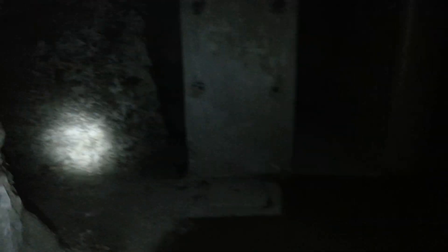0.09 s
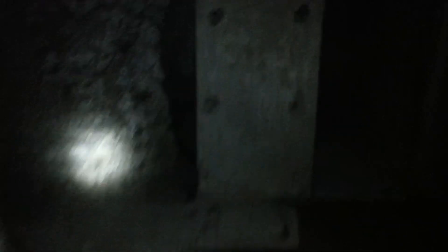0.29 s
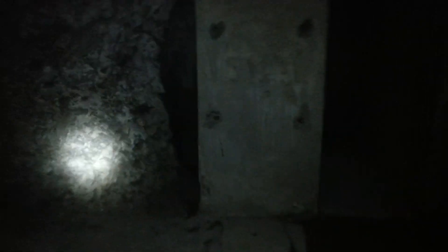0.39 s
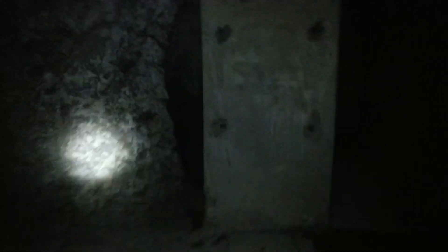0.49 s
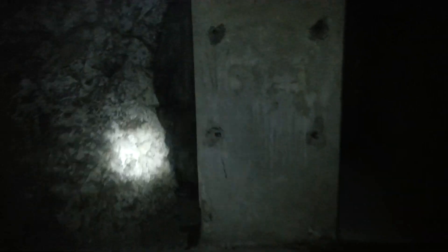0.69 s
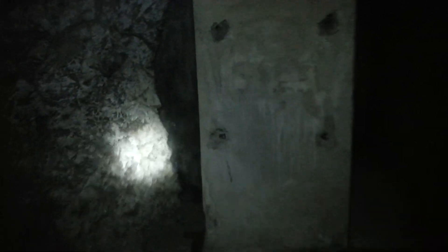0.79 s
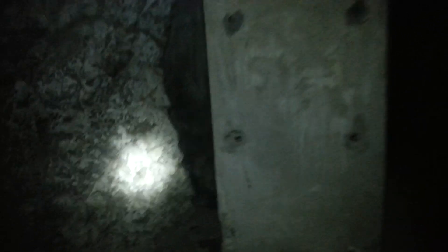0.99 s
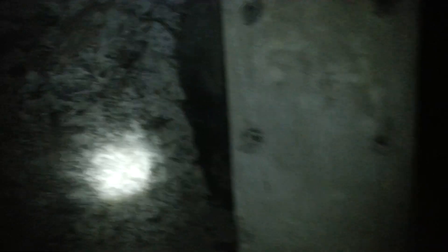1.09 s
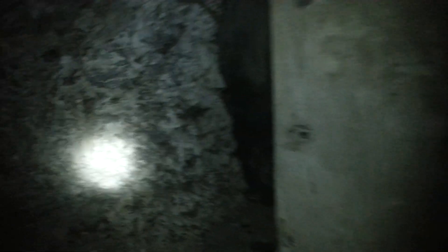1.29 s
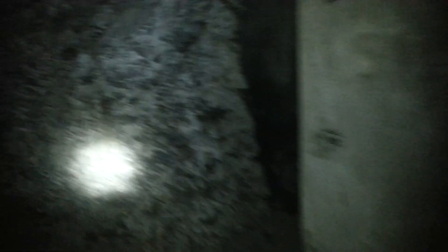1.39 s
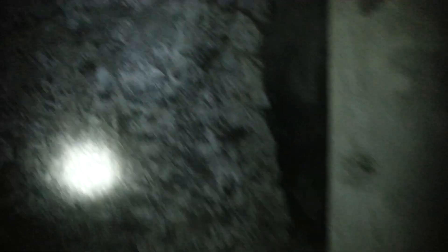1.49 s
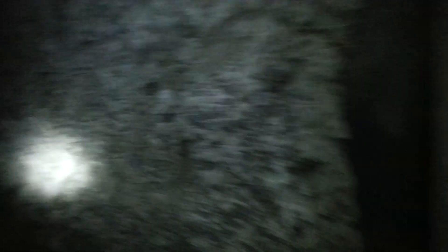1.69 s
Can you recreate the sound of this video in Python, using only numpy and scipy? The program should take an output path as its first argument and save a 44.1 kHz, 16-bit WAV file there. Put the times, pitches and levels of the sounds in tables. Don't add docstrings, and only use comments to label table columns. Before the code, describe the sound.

Footsteps on a gritty rock floor in a narrow stone tunnel: a heavy boot thud, bright clacks of kicked stones, scraping grit, a softer crunch, then a faint next step, heard close on a handheld phone.

```python
import sys
import numpy as np
from scipy import signal
from scipy.fft import rfft, irfft
from scipy.io import wavfile

SR = 44100
rng = np.random.default_rng(int(sys.argv[2]) if len(sys.argv) > 2 else 0)


def level_to_linear(level):
    exponent = np.asarray(level, float) / 20
    return 10 ** exponent


def generate_wav(signal):
    frames = np.transpose(np.atleast_2d(signal))
    scaled = np.clip(frames, -1, 1) * 32767
    pcm = np.round(scaled).astype(np.int16)
    wavfile.write(sys.argv[1], SR, pcm)


N = 74970
LEAD = 8192


def curve(table, hz):
    table = np.array(table, float)
    return np.interp(np.log(np.maximum(hz, 1)), np.log(np.maximum(table[:, 0], 1)), table[:, 1])


def unit(x):
    return x / np.sqrt(np.mean(x ** 2))


def octaves(x, centres):
    size = x.shape[-1]
    hz = np.fft.rfftfreq(size, 1 / SR)
    place = np.log2(np.maximum(hz, 1) / centres[0])
    place = np.clip(place, 0, len(centres) - 1)
    spectrum = rfft(x)
    return [irfft(spectrum * np.maximum(1 - abs(place - k), 0), size) for k in range(len(centres))]


def causal(gain_db):
    cepstrum = irfft(gain_db * np.log(10) / 20, N)
    cepstrum[..., 1:N // 2] *= 2
    cepstrum[..., N // 2 + 1:] = 0
    return np.exp(rfft(cepstrum))


def pair(size):
    # f/Hz, coherence (0-1)
    likeness = [(60, 0.24), (150, 0.84), (300, 0.95), (640, 0.68), (1400, 0.011), (15000, 0.011)]
    alike = np.clip(curve(likeness, np.fft.rfftfreq(size, 1 / SR)), 0, 1)
    mid, side = rfft(rng.standard_normal((2, size)))
    shared = mid * np.sqrt((1 + alike) / 2)
    opposed = side * np.sqrt((1 - alike) / 2) * np.array([[1], [-1]])
    return irfft(shared + opposed, size)


def air():
    # f/Hz, density/dB per Hz
    air_spectrum = [(25, -41), (100, -16), (215, -10), (390, -5), (700, -12.5), (1700, -16), (4500, -20),
                    (13900, -29)]
    colour = level_to_linear(curve(air_spectrum, np.fft.rfftfreq(N, 1 / SR)))
    return level_to_linear(-46.5) * unit(irfft(rfft(pair(N)) * colour, N))


def energy(x):
    return x / np.sqrt(np.sum(x ** 2) / 2)


def tunnel():
    # f/Hz, t60/s
    tail_t60 = [(150, 1), (500, 0.99), (1500, 0.53), (4000, 0.63), (10000, 0.46)]
    # f/Hz, level/dB, t60/s
    cross_modes = [(171.5, -3, 0.49), (218.7, 4.5, 0.99), (247, -12, 0.92), (333.6, -6.5, 0.36),
                   (448, 0, 0.25), (498, 3.5, 0.15), (674, -5, 0.27), (772, 9.5, 0.16)]
    # t/s, spread/s, level/dB
    late_slaps = [
        (0.0136, 0.0008, -12.5),
        (0.032, 0.0048, -17),
    ]
    wall_gap_s, build_up_s, near_t60_s = 0.00095, 0.0023, 0.13
    echo_db, near_db, modes_db = -3, -0.5, -55.5
    size = 32768
    age = np.arange(size) / SR
    onset = np.clip(age / wall_gap_s - 1, 0, 1)

    centres = 125 * 2. ** np.arange(8)
    bands = octaves(pair(size), centres)
    tail = sum(band * level_to_linear(-60 * age / curve(tail_t60, hz)) for hz, band in zip(centres, bands))

    near = pair(size) * level_to_linear(-60 * age / near_t60_s) * (1 - np.exp(-age / build_up_s))
    echoes = level_to_linear(echo_db) * energy(tail) + level_to_linear(near_db) * energy(near)

    slap_shape = 0
    for s, spread, db in late_slaps:
        slap_shape = slap_shape + level_to_linear(db) * np.exp(-((age - s) / spread) ** 2) / np.sqrt(spread * SR)
    slaps = pair(size) * slap_shape

    modes = sum(level_to_linear(db - 60 * age / t60) * np.sin(2 * np.pi * hz * age) for hz, db, t60 in cross_modes)
    response = onset * echoes + slaps + level_to_linear(modes_db) * modes
    response[:, 0] += 1
    return response


def swell(t, s, rise, fall):
    return np.exp(-np.where(t < s, ((t - s) / rise) ** 2, (t - s) / fall))


def grains(size, per_s, scatter_db):
    chance = rng.random((size, 2))
    clicks = (chance[:, 0] < per_s / SR) * level_to_linear(-scatter_db * np.log(chance[:, 1] + 1e-9))
    return clicks * rng.standard_normal((2, size))


def scuffs(t):
    # t/s of the peak, rise/s, fall/s, level/dB, brightness/dB per octave
    drag_table = [(-.03, 0.0057, 0.05, -35.5, -2), (0.046, 0.012, 0.013, -35.5, -2),
                  (0.224, 0.0053, 0.026, -23, -1.5), (0.303, 0.011, 0.0067, -29.5, 4),
                  (0.341, 0.0047, 0.0048, -35.5, 4.5), (0.387, 0.0072, 0.0082, -28.5, -1.5),
                  (0.417, 0.014, 0.02, -29, -1.5), (0.472, 0.017, 0.0056, -22, -0.5),
                  (0.662, 0.017, 0.016, -36.5, 3), (0.729, 0.023, 0.012, -55.5, 8.5),
                  (0.822, 0.019, 0.018, -39, -0.5), (0.854, 0.007, 0.029, -35.5, -3),
                  (0.919, 0.036, 0.034, -26, 2), (0.973, 0.043, 0.027, -33.5, -2.5),
                  (1.031, 0.024, 0.018, -38, 0.5), (1.074, 0.011, 0.033, -32, -1.6),
                  (1.118, 0.022, 0.011, -37.5, -1.1), (1.191, 0.043, 0.027, -44.5, -0.5),
                  (1.485, 0.0061, 0.025, -47.5, 0.5), (1.456, 0.024, 0.047, -49.5, 1.5),
                  (1.523, 0.029, 0.029, -42.5, 0.5), (1.56, 0.0092, 0.01, -50.5, 4.5),
                  (1.605, 0.0091, 0.013, -34, -0.3), (1.652, 0.024, 0.047, -38, 0.4),
                  (1.695, 0.0057, .03, -34.5, -4.3)]
    # f/Hz, density/dB per Hz
    grit_spectrum = [(88, -43), (150, -43), (453, -2), (766, -2.5), (894, -2.5), (2860, -1), (11600, -20.5),
                     (14300, -28), (15500, -78)]
    size = len(t)
    colour = level_to_linear(curve(grit_spectrum, np.fft.rfftfreq(size, 1 / SR)))
    clicks = grains(size, per_s=9000, scatter_db=2)
    grit = unit(irfft(rfft(clicks) * colour, size))
    drags = [(swell(t, s, rise, fall), db, tilt) for s, rise, fall, db, tilt in drag_table]
    centres = 250 * 2. ** np.arange(7)
    out = 0
    for hz, band in zip(centres, octaves(grit, centres)):
        out = out + band * sum(drag * level_to_linear(db + tilt * np.log2(hz / 2000)) for drag, db, tilt in drags)
    return out


def crunches(t):
    # t/s of the peak, rise/s, fall/s, level/dB
    crunch_table = [
        (.925, 0.031, 0.017, -40),
        (1.029, 0.0089, 0.014, -25.5),
        (1.047, 0.011, 0.0071, -36.5),
        (1.074, 0.014, 0.0051, -35.5),
        (1.101, 0.0086, 0.018, -62),
        (1.174, 0.0069, 0.024, -51),
        (1.515, 0.011, 0.06, -64.5),
        (1.642, 0.0037, 0.041, -36.5),
        (1.69, 0.018, 0.027, -44),
    ]
    dull = signal.butter(3, [422, 2000], "band", fs=SR, output="sos")
    clicks = grains(len(t), per_s=1500, scatter_db=2.5)
    gravel = unit(signal.sosfilt(dull, clicks))
    return gravel * sum(level_to_linear(db) * swell(t, s, rise, fall) for s, rise, fall, db in crunch_table)


def stones(t):
    # t/s, level/dB, f/Hz, ring (t60)/ms
    knocks = [(.0452, -6.5, 2190, 2.28), (0.055, -28, 1850, 2.6), (0.264, -12, 3000, 1.3),
              (.217, -18, 2000, 2.5), (.226, -18, 3440, 1.9), (0.2803, -2, 1700, 3), (.2875, -8, 3240, 1.3),
              (0.341, -9.5, 3850, 1.55), (0.385, -17, 2200, 7.4), (0.4112, -2.5, 2290, 1.3),
              (.4175, -7, 2810, 2.95), (0.4665, -4, 2950, 2.2), (.5301, 1, 1750, 5.4),
              (.5303, -1, 2317, 3.2), (0.5435, -28, 1900, 3.5), (0.6586, -15, 3260, 2.9),
              (0.6615, -18, 4170, 2.35), (0.8048, -17, 1890, 1.9), (0.8506, -15, 1990, 6.6),
              (0.857, -13.5, 2500, 4), (0.915, -7, 2920, 2.2), (0.922, -5, 2860, 2.8),
              (0.925, -16, 2290, 2), (1.482, -39, 1750, 5.4), (1.4905, -26, 1770, 7.5),
              (1.506, -41, 1750, 5.5), (1.515, -32, 1690, 13), (1.525, -25, 3600, 4.7),
              (1.538, -32, 1790, 12), (1.548, -30, 1850, 11), (1.557, -34, 1830, 11), (1.602, -21, 2700, 3),
              (1.609, -20, 4150, 3.2), (1.6377, -19, 1530, 4.6), (1.686, -8, 3250, 1.85),
              (1.696, -37, 1950, 3)]
    # multiple of f, level/dB
    overtones = [(1.22, -1.5), (2.3, -10.5)]
    rise_cycles = 1.35
    out = 0
    for s, db, hz, ms in knocks:
        age = np.maximum(t - s, 0)
        tone = np.sin(2 * np.pi * hz * age)
        for multiple, part_db in overtones:
            tone = tone + level_to_linear(part_db) * np.sin(2 * np.pi * hz * multiple * age)
        rise = np.sin(np.pi / 2 * np.minimum(age * hz / rise_cycles, 1)) ** 2
        decay = level_to_linear(db - 60 * age * 1000 / ms)
        out = out + decay * tone * rise
    return out


def ring(x, hz, width_hz):
    return signal.lfilter(*signal.iirpeak(hz, hz / width_hz, SR), x)


def thuds(t):
    # t/s, level/dB, contact (half a cycle)/ms
    blows = [(-.06, -17.5, 0.67), (.014, -27.5, 1.45), (0.218, -41, 0.26), (0.2221, -17, 1.27),
             (0.2261, -8, 0.71), (.237, -13, 1.4), (.245, -16, 0.81), (0.26, -16.5, 0.81),
             (0.2813, -6.5, 0.59), (.282, -15, 1.78), (0.2853, -20, 1.82), (0.2902, -21, 0.75),
             (0.2991, -23, 0.82), (0.304, -25, 0.44), (.315, -24, 2.6), (0.381, -34, 1), (0.389, -29, 2),
             (.485, -26.5, 2.1), (0.663, -27.5, 1.1), (.672, -34, 2.2), (.886, -32, 1.5), (.912, -26, 0.88),
             (0.922, -20.5, 0.84), (.97, -28.5, 1.02), (1.019, -24, 0.46), (1.025, -23.5, 0.88),
             (1.031, -23.5, 0.42), (1.042, -37, 0.42), (1.064, -19, 0.38), (1.092, -27.5, 0.4),
             (1.119, -52.5, 2.4), (1.137, -40, 6.5), (1.601, -32.5, 0.64), (1.611, -36, .7),
             (1.637, -42, 2)]
    push = 0
    for s, db, ms in blows:
        cycle = np.clip((t - s) * 500 / ms, 0, 1)
        push = push + level_to_linear(db) * np.sin(2 * np.pi * cycle)
    return push + level_to_linear(-1) * ring(push, hz=250, width_hz=424)


def scene():
    places_s = [
        .21,
        .375,
        .525,
        .8,
        1.005,
        1.44,
    ]
    # f/Hz, left minus right/dB
    left_lean = [(100, 0), (300, 2), (600, 0.7), (1300, 4), (2500, 3), (5000, 2), (8000, 0), (13000, 3.5)]
    # f/Hz, gain/dB
    mic_response = [(900, 1), (1450, 3), (1780, 5), (2100, -2), (2600, 0.5), (4800, 2.5), (5400, -2),
                    (14300, -1.5)]
    # f/Hz, gain/dB
    bass_response = [(30, -50), (70, -25), (120, -18), (160, -11.5), (200, -7), (240, -0.5), (300, 0)]
    port_lag_s = .00003

    t = (np.arange(N + LEAD) - LEAD) / SR
    steps = thuds(t) + stones(t) + scuffs(t) + crunches(t)
    place = np.searchsorted(places_s, t)
    heard = 0
    for k in range(len(places_s) + 1):
        echoed = signal.fftconvolve(steps * (place == k), tunnel(), axes=1)
        heard = heard + echoed[:, LEAD:LEAD + N]

    hz = np.fft.rfftfreq(N, 1 / SR)
    side = np.array([[.5], [-.5]])
    lag = np.exp(2j * np.pi * hz * port_lag_s * side)
    ports = causal(curve(left_lean, hz) * side + curve(mic_response, hz)) * lag
    sound = rfft(heard) * causal(curve(bass_response, hz)) + rfft(air())
    return irfft(sound * ports, N)


def roll_off(x):
    return signal.sosfilt(signal.butter(12, 15760, fs=SR, output="sos"), x)


def record(dry):
    low_pass = signal.ellip(8, .2, 70, 14650, fs=SR, output="sos")
    cut = signal.sosfilt(low_pass, dry)
    return roll_off(np.clip(cut, -1, 1))


dry = scene()
out = record(dry)
generate_wav(out)
```